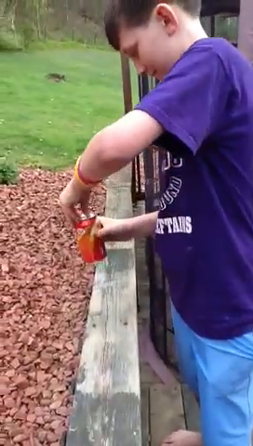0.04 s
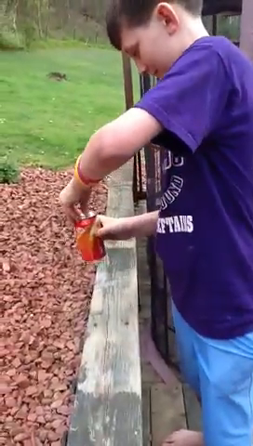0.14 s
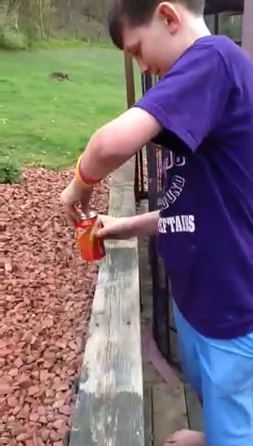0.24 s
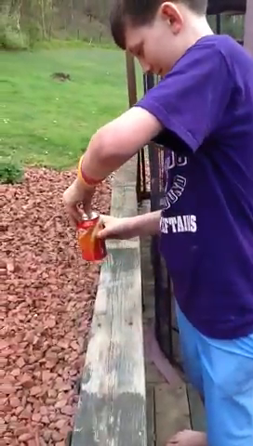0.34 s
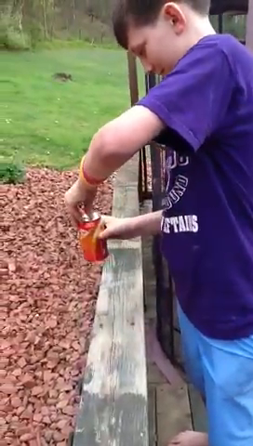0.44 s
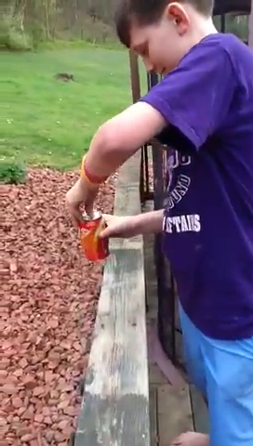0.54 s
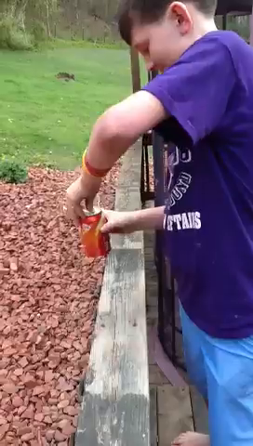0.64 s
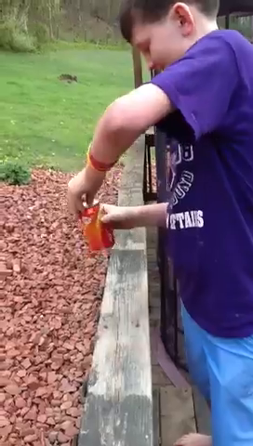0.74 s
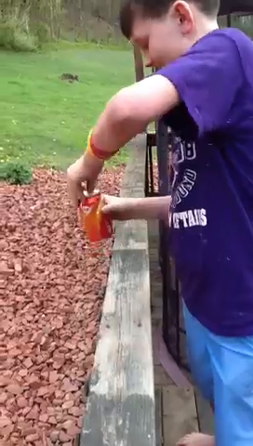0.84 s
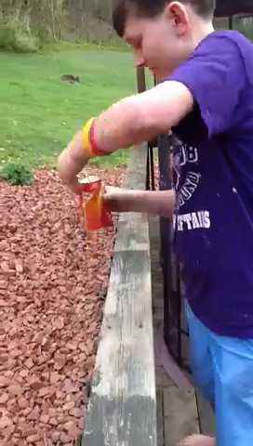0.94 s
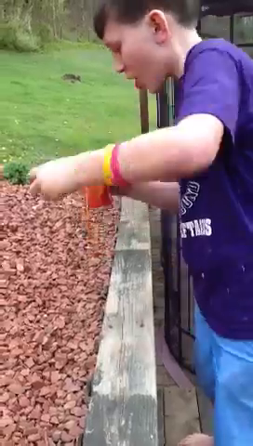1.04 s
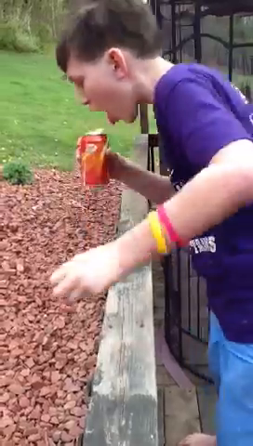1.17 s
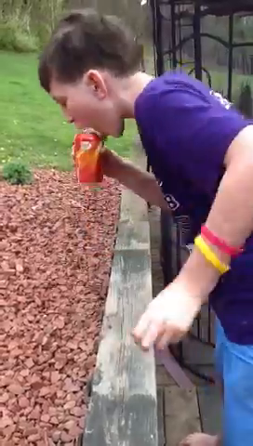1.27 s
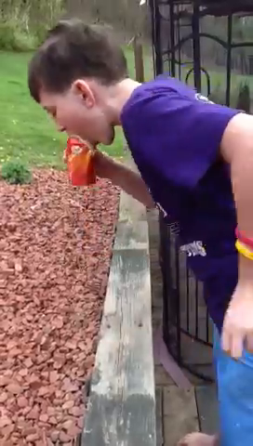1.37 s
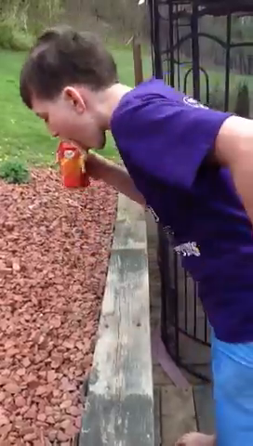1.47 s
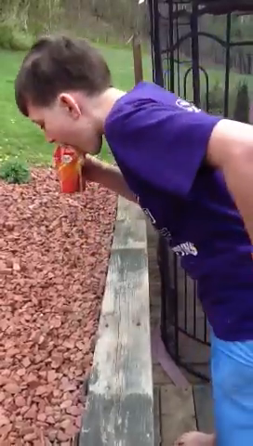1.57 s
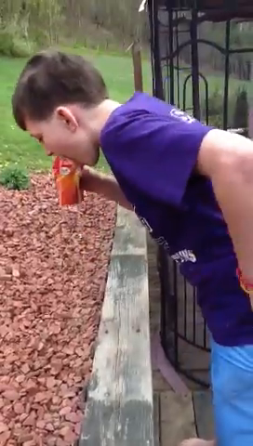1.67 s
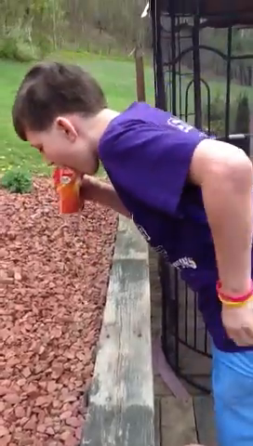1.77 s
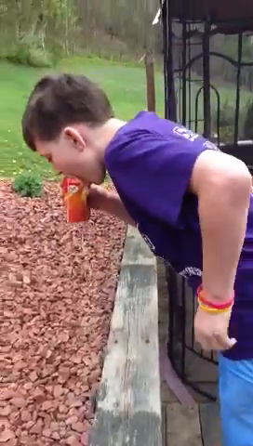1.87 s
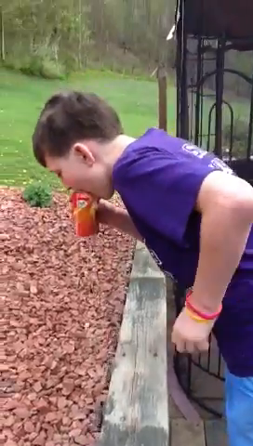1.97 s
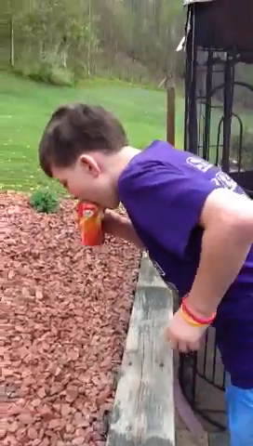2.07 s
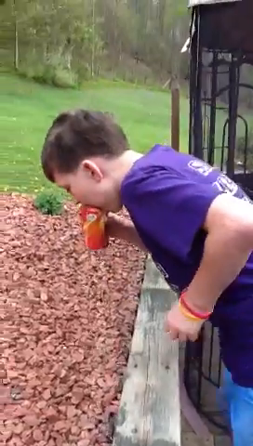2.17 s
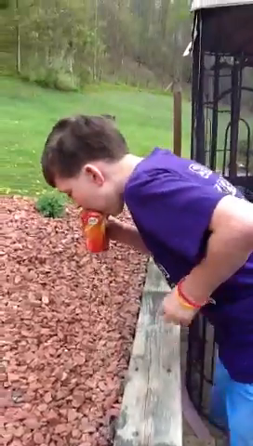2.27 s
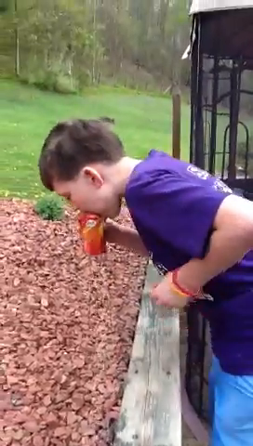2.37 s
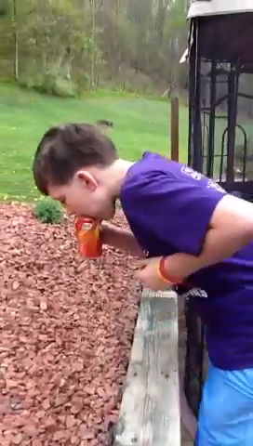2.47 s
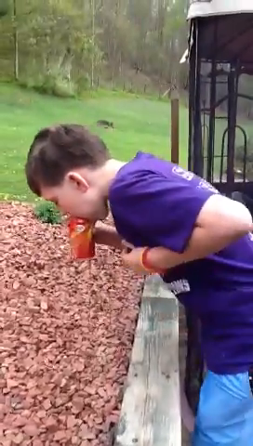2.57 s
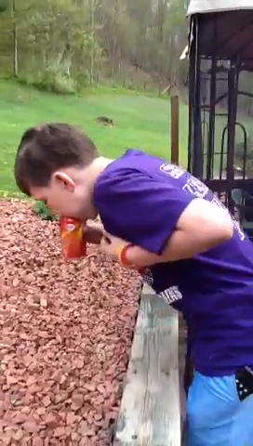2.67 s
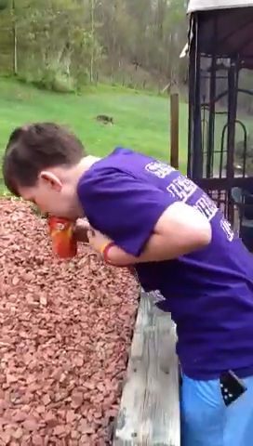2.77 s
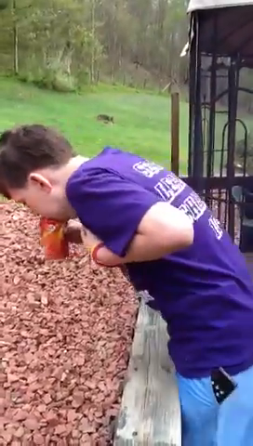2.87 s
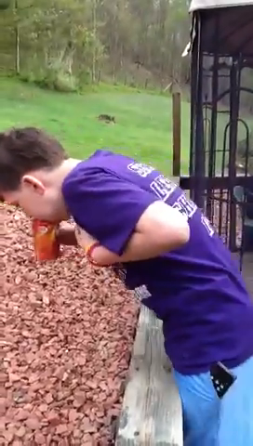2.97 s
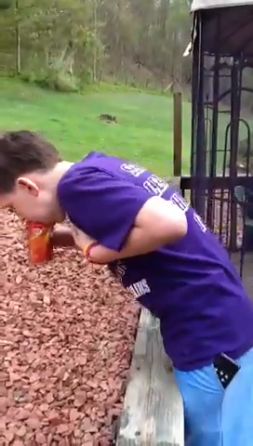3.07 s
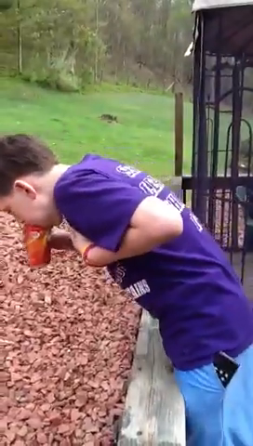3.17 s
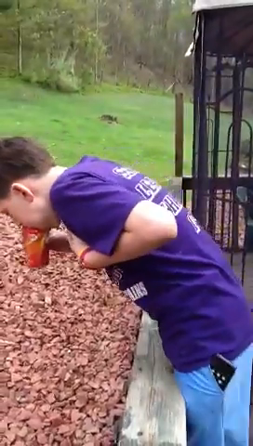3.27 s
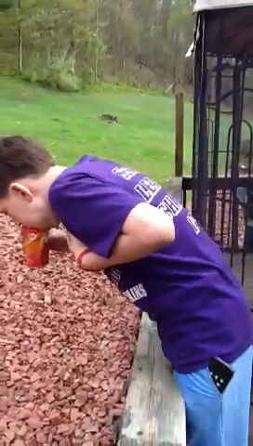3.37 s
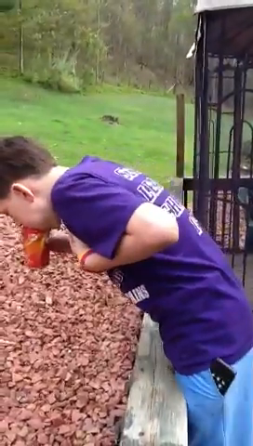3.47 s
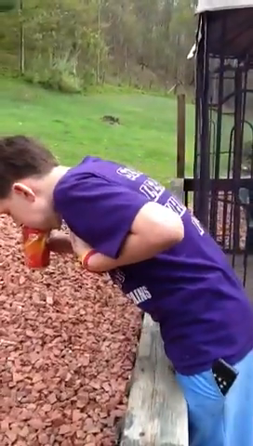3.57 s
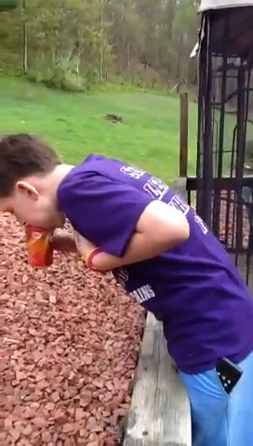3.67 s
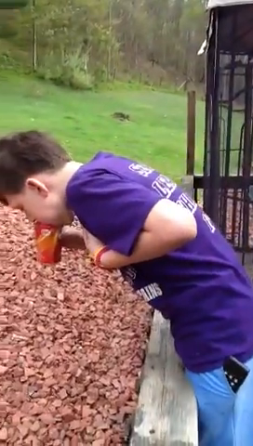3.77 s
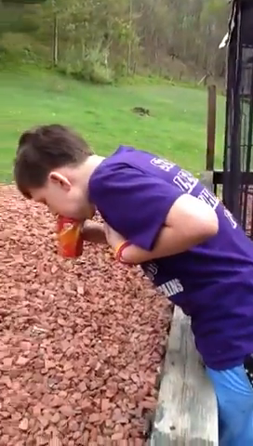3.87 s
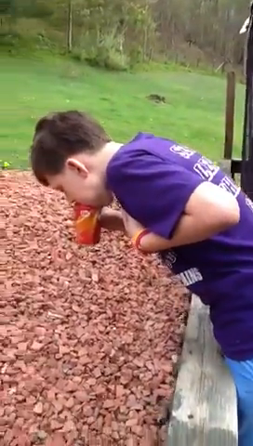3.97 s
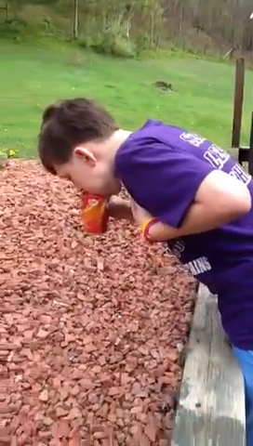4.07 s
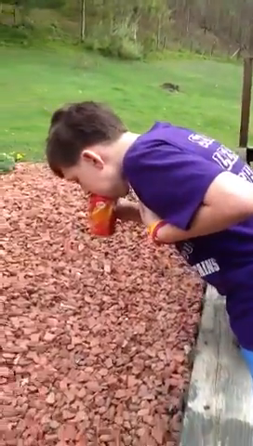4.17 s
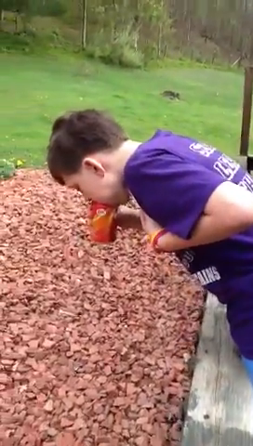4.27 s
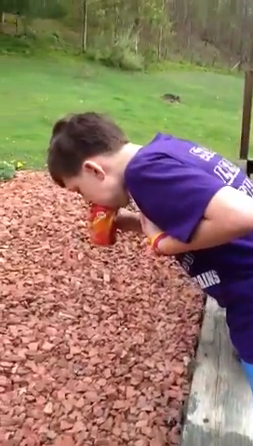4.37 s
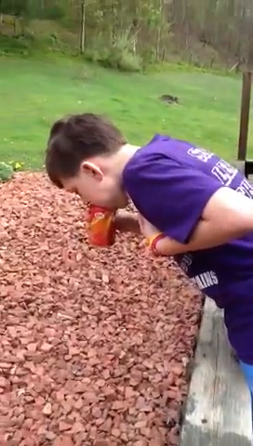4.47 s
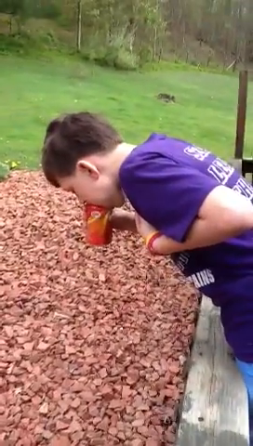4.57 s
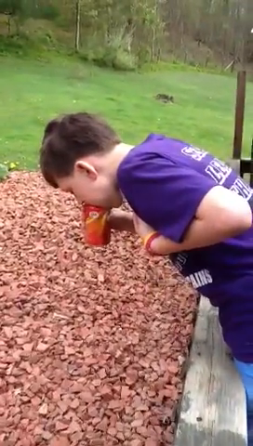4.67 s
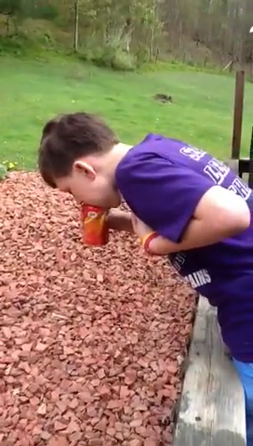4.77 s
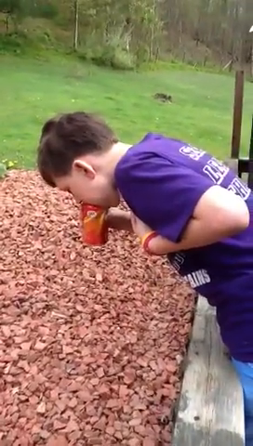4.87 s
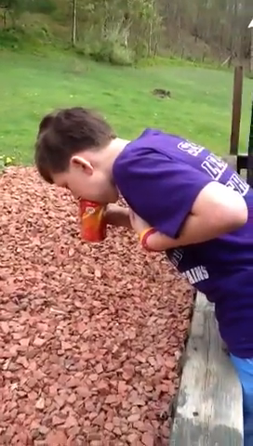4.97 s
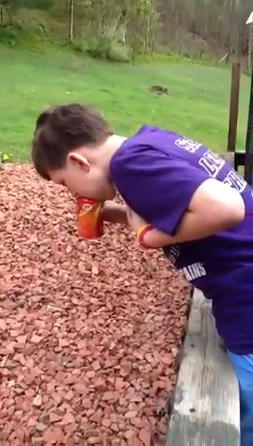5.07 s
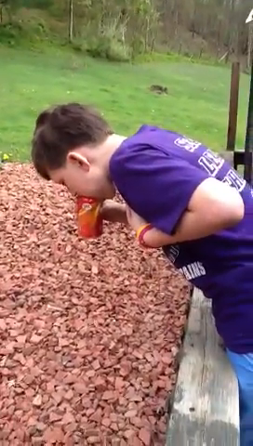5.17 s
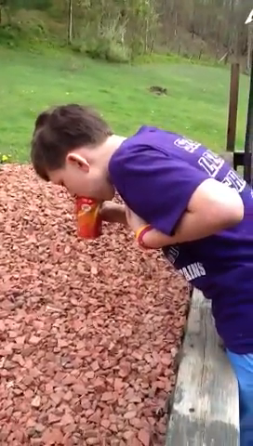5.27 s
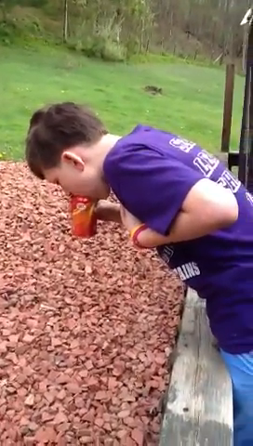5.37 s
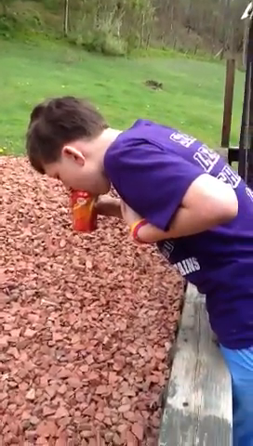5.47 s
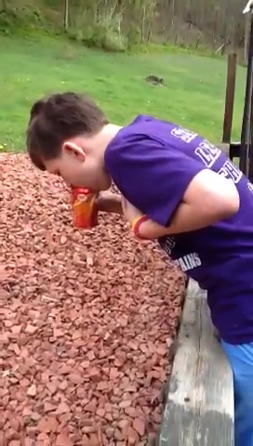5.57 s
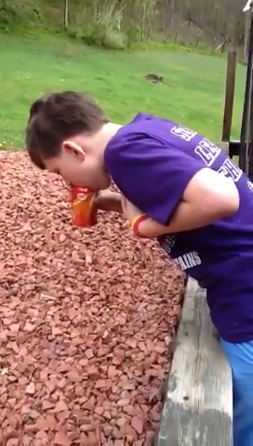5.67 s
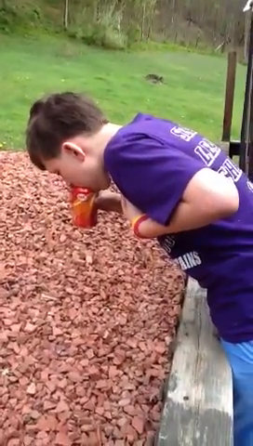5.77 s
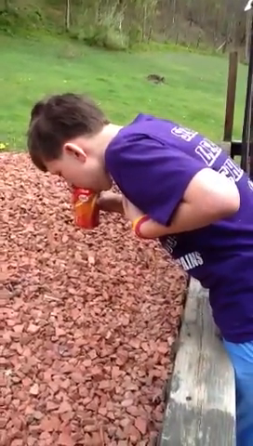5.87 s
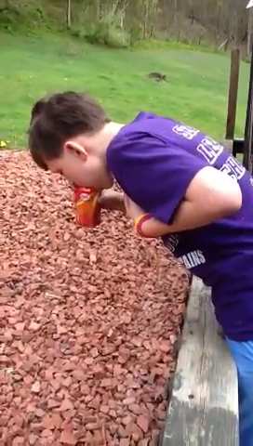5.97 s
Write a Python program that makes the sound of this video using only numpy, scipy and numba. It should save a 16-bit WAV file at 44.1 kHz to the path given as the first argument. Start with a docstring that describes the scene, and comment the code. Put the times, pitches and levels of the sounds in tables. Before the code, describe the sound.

A few dry metal ticks lead to a very loud, brief, sputtering hiss as a shaken can opens, ending in hard clicks. Much quieter crackling foam follows, thin at first, then a busy irregular patter of wet little drops on stones with bubbling and wash. Faint rustles and dull thuds on boards surround it, in a dry open garden heard from a step away on a phone.

```python
"""Drink can cracked open outdoors

A shaken can opens a step from a phone: the seal ticks, noise-made gas tears out, the tab snaps in and chokes it.
Foam runs over as fizz and wash; drops splat on gravel as short pings with spray, and bubbles gurgle as rising tones.
Soft thuds of feet on boards, rustles of filtered grit and a faint garden hush lie around the can.
The phone's gain control ducks under the blast and creeps back over seconds."""
import sys
import numpy as np
from scipy import signal
from scipy.fft import rfft, irfft, next_fast_len
from scipy.io import wavfile
from scipy.ndimage import uniform_filter1d
from numba import njit

SR = 44100
rng = np.random.default_rng(int(sys.argv[2]) if len(sys.argv) > 2 else 0)


def file_out(sig):
    """Save sig as 16-bit WAV at sys.argv[1]."""
    # one column per channel
    cols = np.atleast_2d(sig).T
    # limit, then scale
    lim = np.clip(cols, -1, 1)
    pcm = np.round(lim * 32767).astype(np.int16)
    wavfile.write(sys.argv[1], SR, pcm)


N = 265863  # length in samples, about 6 s


def undb(db):
    """Gain of a level in dB."""
    return 10 ** (np.asarray(db) / 20)


def curve(rows):
    """Gain along a table of (seconds, dB) rows; silent outside it."""
    s, db = np.transpose(rows)
    return undb(np.interp(np.arange(N) / SR, s, db, left=-200, right=-200))


def fall(t, t60):
    """Exponential decay that loses 60 dB in t60 seconds."""
    return np.exp(-np.log(1000) * t / t60)


def colour(x, points):
    """Shape a signal's spectrum by (Hz, dB) points and bring it to rms 1."""
    hz, db = np.transpose(points)
    size = next_fast_len(N)
    f = np.maximum(np.arange(size // 2 + 1) * SR / size, 1)
    gain = undb(np.interp(np.log(f), np.log(hz), db))
    y = irfft(rfft(x, size) * gain, size)[:N]
    return y / np.sqrt(np.mean(y ** 2))


def walk(rate, size=N):
    """Random levels of spread near 1, a new one every 1 / rate seconds, with straight slides between them."""
    k = int(SR / rate)
    held = np.repeat(rng.standard_normal(size // k + 1), k)
    return uniform_filter1d(held, k)[:size]


def add(out, s, sound):
    """Mix a short sound in at time s."""
    i = int(s * SR)
    out[i:i + len(sound)] += sound[:max(N - i, 0)]


def band(x, low_hz, high_hz):
    """Band-pass between two frequencies."""
    return signal.sosfilt(signal.butter(2, [low_hz, high_hz], "band", fs=SR, output="sos"), x)


def ring(hz, t60, rise, glide=0.):
    """A decaying tone with a rounded onset and peak 1; a positive glide raises its pitch as it rings."""
    t = np.arange(int(t60 * SR) + 9) / SR
    tone = np.sin(2 * np.pi * hz * t * (1 + glide * t / t60))
    y = fall(t, t60) * (1 - np.exp(-t / rise)) * tone
    return y / np.max(np.abs(y))


def splat(hz, t60, spray_db, spray_t60, low_hz):
    """A short high-passed ping with a burst of spray noise over it."""
    t = np.arange(2048) / SR
    spray_band = signal.butter(4, [low_hz, 14500.], "band", fs=SR, output="sos")
    hiss = signal.sosfilt(spray_band, rng.standard_normal(len(t)))
    y = undb(spray_db) * hiss * fall(t, spray_t60) * (1 - np.exp(-t / 0.00018))
    thin = signal.butter(2, hz / 1.76, "high", fs=SR, output="sos")
    add(y, 0, signal.sosfilt(thin, ring(hz, t60, 1e-4)))
    return y


def grains(rate, spread_db, smear_s, cap=1.95):
    """Noise in random bursts, rate per second, of uneven but bounded size that decay over smear_s."""
    chance = rng.random((2, N))
    excess = np.minimum(-np.log(1 - chance[1]), cap)
    size = (chance[0] < rate / SR) * undb(spread_db * excess)
    swell = signal.lfilter([1], [1, -np.exp(-1 / (smear_s * SR))], size)
    return swell * rng.standard_normal(N)


def hollow(hz, width_hz):
    """Noise in a resonance whose centre follows hz, made by shifting slow noise up in pitch; rms 1."""
    low_pass = signal.butter(2, width_hz / 2, fs=SR, output="sos")
    slow = signal.sosfilt(low_pass, rng.standard_normal((2, len(hz))))
    phase = 2 * np.pi * np.cumsum(hz) / SR
    y = slow[0] * np.cos(phase) + slow[1] * np.sin(phase)
    return y / np.std(y)


def patchy(x, edges, slow_db, quick_db):
    """Split at the edges (Hz); every band swells and flickers on its own."""
    out = 0
    for hz in edges:
        low = signal.sosfilt(signal.butter(1, hz, fs=SR, output="sos"), x)
        out = out + low * undb(slow_db * walk(6.0) + quick_db * walk(22))
        x = x - low
    return out + x * undb(slow_db * walk(3.97) + quick_db * walk(22))


def garden():
    """Outdoor hush: coloured noise that wanders band by band."""
    # Tone of the hush. Each row: frequency in Hz, relative density in dB per Hz.
    hush_colour = [(15, -62.5), (25, -35), (118, -7.5), (172, -1.5), (465, -6), (592, -4.5), (754, -1.5),
                   (1040, -5), (1600, -7), (2100, -7), (4800, -10.5), (13300, -14.5), (15200, -15.5)]
    # The hush swells and sinks. Each row: time in seconds, level in dB.
    hush_level = [(0, -59), (2, -56), (4, -56.5), (4.5, -55.5), (5, -58), (6.03, -58)]
    noise = colour(rng.standard_normal(N), hush_colour)
    edges = (130., 300., 550., 1000., 1800., 3500.)
    return curve(hush_level) * patchy(noise, edges, slow_db=1.85, quick_db=2.0)


def gurgles():
    """Bubbles ring longer the lower they are, rise in pitch and are blurred by the foam; faint ones murmur low."""
    # Bubbles at the rim. Each row: start in seconds, peak in dB before the blur, starting pitch in Hz.
    bubbles = [(1.378, -53, 1010), (1.495, -55, 1760), (2.775, -53.5, 660), (3.076, -56, 1750),
               (3.105, -55.5, 630), (3.108, -57, 956), (3.463, -51.5, 623), (3.756, -51.5, 1940),
               (4.245, -55, 2297), (4.624, -53, 2100), (4.841, -55, 887), (5.053, -48.5, 2440),
               (5.188, -52, 1710), (5.379, -52.5, 864), (5.452, -56, 1045), (5.564, -50.5, 1720),
               (5.613, -51, 2270), (5.672, -51, 962), (5.686, -53.5, 1020), (5.778, -54, 795)]
    out = np.zeros(N)
    for s, db, hz in bubbles:
        add(out, s, undb(db) * ring(hz, 0.0086 + 31 / hz, 2.6 / hz, glide=0.059))
    for when, pitch, size in rng.random((420, 3)):  # the murmur runs from start to end
        tone = ring(580. * 1.9 ** pitch, 0.055, 0.0059, glide=0.025)
        add(out, when * N / SR, undb(-63.5 - 5.2 * size) * tone)
    return out * (1 + 0.4 * walk(400))


def handling():
    """Dry ticks of fingers on the tab, and faint hollow tones of the shell that waver in level."""
    # Finger ticks. Each row: start in seconds, ping peak in dB, pitch in Hz.
    ticks = [(0.066, -41.5, 3900), (.341, -45, 6040), (.426, -49, 5200), (.867, -40, 2380),
             (.879, -45, 2220), (.895, -45, 3300)]
    # Shell tones. Each row: centre in seconds, reach to either side in seconds, level in dB, pitch in Hz.
    shell_tones = [(0.113, .025, -64, 1980), (0.11, 0.022, -63, 770), (0.128, .03, -63, 930),
                   (0.234, .02, -62.5, 606), (0.51, .07, -57, 615)]
    out = np.zeros(N)
    for s, db, hz in ticks:
        add(out, s, undb(db) * splat(hz, 14 / hz, -4.0, spray_t60=0.0072, low_hz=3000.))
    for s, reach, db, hz in shell_tones:
        swell = np.hanning(int(2 * reach * SR))
        tone = np.sin(2 * np.pi * hz * np.arange(len(swell)) / SR)
        waver = 1 + .4 * walk(150)[:len(swell)]
        add(out, s - reach, undb(db) * swell * tone * waver)
    return out


def rustles():
    """Hands, cloth, splashes and low stirs: swells of grainy noise about two octaves wide."""
    # Each row: centre in seconds, reach to either side in seconds, level in dB, middle of the band in Hz.
    swells = [(0.432, 0.046, -59, 4900), (1.214, 0.024, -59, 4600), (1.348, 0.062, -58.5, 1760),
              (2.638, 0.042, -56.5, 4880), (2.933, 0.022, -52.5, 4500), (3.298, 0.059, -53, 8050),
              (3.502, 0.055, -54, 4500), (4.332, 0.025, -50.5, 6960), (4.517, 0.055, -55.5, 5500),
              (4.5, 0.43, -60.5, 400)]
    grit = grains(1500., 1.5, 0.0011)
    out = np.zeros(N)
    for s, reach, db, hz in swells:
        swell = np.hanning(int(2 * reach * SR))
        part = band(grit[int(s * SR):][:len(swell)], hz / 2.04, min(2.0 * hz, 19000.))
        add(out, s - reach, undb(db) * swell * part / np.std(part))
    return out


def pressure():
    """Gains of the jet, its treble and its bass: a thin leak, the hole bursts, pressure sags, the tab chokes it."""
    leak_s, leak_db = .547, -44
    burst_s, burst_db, burst_rise_s, burst_from_db = .5585, -10, 0.011, -12  # starts 12 dB under its target
    bass_from_db, bass_rise_s = -15, 0.0094  # the low rush fills in after the burst
    sag_db, sag_s = -5, 0.013  # loss reached at the snap, and how late it sets in
    snap_s, choke_s, choked_db, fade_db_s = 0.7238, 0.0022, -25.5, 598
    treble_db, early_db, early_s, late_db, late_s = 4.5, 3.75, 0.0096, -26.25, 0.015
    t = np.arange(N) / SR
    since = np.maximum(t - burst_s, 0)
    until = np.maximum(snap_s - t, 0)
    choked = np.clip((t - snap_s) / choke_s, 0, 1)

    blow_db = np.where(t > burst_s, burst_db, leak_db)
    blow_db = blow_db + burst_from_db * np.exp(-since / burst_rise_s) + sag_db * np.exp(-until / sag_s)
    dying_db = choked_db - fade_db_s * np.maximum(t - snap_s, 0)
    level_db = (1 - choked) * np.maximum(blow_db, leak_db) + choked * dying_db
    bright_db = treble_db + early_db * np.exp(-since / early_s) + late_db * np.exp(-until / late_s)

    level = undb(np.maximum(level_db, -200)) * (t > leak_s)
    treble = undb((1 - choked / 1.5) * bright_db)  # choking leaves a third of the tilt
    bass = undb(bass_from_db * np.exp(-since / bass_rise_s))
    return level, treble, bass


def jet():
    """Turbulent gas whose bands sputter apart and whose resonances surge and shift, and the tearing lid."""
    # Tone of the gas. Each row: frequency in Hz, relative density in dB per Hz.
    gas_colour = [(71, -72), (120, -32), (220, -19.5), (856, -21), (1600, -19.5), (2200, -8.5), (2720, -11),
                  (2950, -8), (4510, -3.5), (6110, -3), (8800, -2.5), (10100, -6), (15200, -4.5)]
    # Resonances of the torn opening. Each row: centre in Hz, width in Hz, level in dB re the jet before surging.
    opening = [(1101, 300, -29), (2250, 600, -24), (4404, 1200, -17)]
    # Tears of the lid. Each row: start in seconds, ping peak in dB, pitch in Hz, ping t60 in seconds,
    # drive of the crack noise in dB re the ping, low edge of the crack in Hz.
    tears = [(0.5443, -21.5, 4910, 0.0056, 6, 4000), (0.565, -9, 8130, .004, -4.5, 4530),
             (0.604, -5, 8800, .004, -3.5, 4000), (0.6672, 2, 4900, 0.004, -4, 3500),
             (0.672, -1.5, 4450, 0.0076, -6.5, 2980), (0.6998, 0, 4840, 0.003, 0, 4200),
             (0.7185, 0, 5800, 0.0015, 2, 1600)]
    wander, surge_db = .08, 3.5  # spread of each centre as a share of it; level swing of each resonance
    gas = colour(rng.standard_normal(N), gas_colour)
    mid = band(gas, 3060.0, 6500.0)
    top = band(gas, 7800.0, 19100.0)
    spit = undb(0.78 * walk(700))  # droplets flutter the whole stream
    swings_db = ((2.1, 1.0), (1.0, 0.98), (0.63, 0.51))  # quick and slow, for the rest, mid and top
    sputter = [spit * undb(quick_db * walk(250) + slow_db * walk(59.9)) for quick_db, slow_db in swings_db]

    level, treble, bass = pressure()
    stream = (gas - mid - top) * sputter[0] * bass
    stream += mid * sputter[1] + top * sputter[2] * treble
    for hz, width_hz, db in opening:  # the jet is over within the first second
        surge = undb(db + surge_db * walk(70, size=SR)) * bass[:SR]
        centre = hz * (1 + wander * walk(30, size=SR))
        add(stream, 0, surge * hollow(centre, width_hz))
    out = level * stream
    for s, db, hz, t60, crack_db, low_hz in tears:
        add(out, s, undb(db) * splat(hz, t60, crack_db, 0.0052, low_hz))
    return out


def patter():
    """Running foam: fine fluttering fizz, small drops of mixed pitch, and a wet wash in the can's mouth."""
    # Tone of the fizz. Each row: frequency in Hz, relative density in dB per Hz.
    fizz_colour = [(900, -43), (1500, 9), (2400, -12), (5500, 5), (9000, -9), (14000, -13), (16000, 4.5)]
    # Foam over the rim. Each row: time in seconds, level in dB of its small drops once full-grown.
    foam = [(.8, -60), (1.3, -54), (2.2, -64.5), (2.85, -59.5), (3.35, -59), (3.8, -57.5), (4.05, -65),
            (4.55, -56.5), (4.75, -61.5), (4.95, -56), (5.2, -62), (5.45, -63), (6.03, -69.5)]
    # Wash in the can's mouth. Each row: time in seconds, level in dB.
    wash_level = [(.8, -71), (1.3, -73), (2.6, -65.5), (3.4, -81), (3.9, -68.5), (4.4, -57.5), (4.95, -64),
                  (5.2, -71), (6.03, -68)]
    fizz_db = -7  # re the full-grown small drops
    fizz = colour(grains(600., 5.7, 0.00052), fizz_colour)
    small = 0
    for hz in (2600.0, 3800.0, 4620.0, 6270.0, 10400.0):
        small = small + band(grains(90., 6.5, 0.0006, cap=2.1), hz, min(1.7 * hz, 19000.))
    # the small drops grow once foam reaches the ground
    drips = undb(np.interp(np.arange(N) / SR, [1.44, 1.44 + 0.68], [-7.5, 0]))
    wash_colour = [(900, -27), (1800, 0.5), (2300, 2.0), (2550, -4.5), (2800, 3.0), (4200, -27)]  # (Hz, dB)
    wash = colour(grains(500., 3.5, 0.0033, cap=1.3), wash_colour)
    foaming = undb(fizz_db) * fizz + drips * small / np.std(small)
    return curve(foam) * foaming + curve(wash_level) * wash


def drops():
    """Each drop landing on gravel pings briefly and scatters spray."""
    # Each row: time in seconds, to which 0.74 ms is added, ping peak in dB, pitch in Hz,
    # drive of the spray noise in dB re the ping.
    landings = [(1.9346, -40, 9150, 6), (2.0067, -47, 3140, 13), (2.284, -36.5, 10600, -10),
                (2.303, -38.5, 7630, 4), (2.4515, -33, 6500, -9), (2.758, -39, 7210, 1),
                (2.8047, -33, 3240, -6), (2.8206, -34.5, 4450, -5.5), (2.8424, -32.5, 2920, -6),
                (2.9473, -50, 3700, 14), (2.9655, -34, 4850, 1.5), (3.011, -38, 4700, -5),
                (3.0474, -37.5, 7050, 0), (3.25, -34, 5950, -13), (3.344, -32.5, 10600, -7),
                (3.367, -36, 2800, 2), (3.385, -38, 9000, -10), (3.3974, -40, 3200, 0),
                (3.4318, -40, 8000, -2), (3.4694, -41, 6500, 0), (3.56, -33.5, 6340, -3.5),
                (3.588, -36, 3980, 0), (3.6203, -32.5, 6900, -5), (3.6685, -37, 6680, -1),
                (3.712, -39, 4400, -6), (3.75, -41.5, 4730, 2), (3.792, -37.5, 3430, -16),
                (3.8265, -33.5, 4560, -22), (3.866, -38, 5960, -2), (3.881, -26.5, 5330, -3.5),
                (3.9103, -38, 10800, -9), (3.938, -42, 9000, 3), (3.9422, -39.5, 5800, -4),
                (3.9695, -48, 5180, 5), (4.0873, -38.5, 4230, -2.5), (4.1502, -29, 4700, -9.5),
                (4.178, -42, 4940, -1), (4.2032, -44, 2800, 6), (4.2304, -34, 4100, -3.5),
                (4.266, -39.5, 4210, -3), (4.278, -35.5, 5800, -6), (4.2969, -34.5, 7900, -17),
                (4.312, -42, 4500, 2), (4.41, -41, 4000, -4), (4.482, -40.5, 5510, 3.5),
                (4.495, -40, 4800, -4), (4.5251, -33, 5720, -7), (4.536, -42, 4050, 4),
                (4.5714, -39, 7430, -1), (4.591, -34.5, 7740, -8), (4.6326, -36, 5140, -11),
                (4.644, -31.5, 6000, -5), (4.663, -36, 6500, 0), (4.694, -40.5, 5560, -3),
                (4.7256, -32.5, 5900, -9), (4.7593, -32.5, 4670, -3.5), (4.7955, -41, 9570, 0.5),
                (4.8281, -28, 8700, -7), (4.909, -32, 8150, -6), (4.9527, -37, 8370, -9),
                (4.9654, -36, 4430, -3), (5.0115, -39, 6080, -5), (5.053, -35.5, 8100, -2),
                (5.0936, -35.5, 7150, -12), (5.11, -37, 8520, -9), (5.1374, -41.5, 8360, 5.5),
                (5.152, -35, 8300, -5), (5.1874, -35.5, 3040, 0.5), (5.2326, -29, 4870, -10),
                (5.2489, -33, 4440, -0.5), (5.293, -38, 4200, -3), (5.335, -38.5, 5650, 0.5),
                (5.3812, -33.5, 8100, 0), (5.4498, -36, 9700, -7), (5.495, -42, 11200, -0.5),
                (5.636, -38.5, 7100, 0.5), (5.687, -44, 11000, -3), (5.7472, -39, 5700, -6),
                (5.959, -47.5, 10000, -2)]
    out = np.zeros(N)
    for s, db, hz, spray_db in landings:
        add(out, s + 0.00074, undb(db) * splat(hz, 16 / hz, spray_db, spray_t60=0.014, low_hz=2950.0))
    return out


def feet():
    """Soft thuds through the boards, each a blunt ring with a rough rumble that outlasts its decay."""
    # Each row: start in seconds, ring peak in dB, pitch in Hz, ring t60 in seconds.
    thuds = [(2.855, -57, 400, 0.1), (2.872, -50.5, 283, 0.085), (3.2, -47, 398, 0.025),
             (3.202, -53, 205, 0.11), (5.709, -63.5, 84, 0.17), (5.925, -53.5, 95.5, 0.12)]
    out = np.zeros(N)
    for s, db, hz, t60 in thuds:
        rumble = band(rng.standard_normal(8192), hz / 1.6, hz * 1.6)
        fade = fall(np.arange(len(rumble)) / SR, 2.9 * t60)
        add(out, s, undb(db) * ring(hz, t60, 1.6 / hz))
        add(out, s, undb(db - 4.0) * fade * rumble / np.std(rumble))
    return out


def slurp():
    """A slurp at the rim: rough hollow noise whose pitch falls as foam is sucked in."""
    start_s, length_s, level_db = 2.925, 0.044, -53.5
    from_hz, to_hz, width_hz = 3300, 849, 800
    swell = np.hanning(int(length_s * SR))
    out = np.zeros(N)
    hz = np.geomspace(from_hz, to_hz, len(swell))
    add(out, start_s, undb(level_db) * np.sqrt(swell) * hollow(hz, width_hz))
    return out


def porch(near):
    """Short scatter back from porch and ground: a decaying noise tail after a 2 ms gap."""
    t60_s, level_db = 0.044, -12  # level: energy of the scatter re the direct sound
    t = np.arange(int(.15 * SR)) / SR
    tail = rng.standard_normal(len(t)) * fall(t, t60_s) * (t > .002)
    tail = undb(level_db) * tail / np.sqrt(np.sum(tail ** 2))
    return signal.fftconvolve(near, tail)[:N]


def scene():
    """The can's sounds with their scatter, plus feet, rustles and garden; one microphone feeds both channels."""
    near = gurgles() + handling() + jet() + patter() + drops() + slurp()
    mono = garden() + rustles() + near + porch(near) + feet()
    return np.array([mono, mono])


@njit
def duck(want_db, attack, recover):
    """Gain in dB: falls quickly to what the level asks for, climbs back at a steady pace."""
    out, g = np.empty(len(want_db)), 0.
    for i in range(len(want_db)):
        if want_db[i] < g:
            g = g + attack * (want_db[i] - g)
        else:
            g = min(g + recover, want_db[i])
        out[i] = g
    return out


def record(dry):
    """Gain control driven by the power smoothed over 20 ms, then the deep bass and the top are cut."""
    knee_db, squeeze = -39.5, 0.34  # squeeze: dB of cut asked for per dB above the knee
    attack_s, recover_db_s = 0.0012, 4.5
    shelf_hz, top_hz = 15250, 16387  # where the top drops by 38 dB, and the final cut
    power = signal.lfilter([1 / 882], [1, 1 / 882 - 1], dry[0] ** 2)  # 882 samples are 20 ms
    level_db = 10 * np.log10(power + 1e-12)
    want_db = -squeeze * np.maximum(level_db - knee_db, 0)
    y = dry * undb(duck(want_db, 1 / (attack_s * SR), recover_db_s / SR))
    y = signal.sosfilt(signal.butter(2, 65., "high", fs=SR, output="sos"), y)
    y = signal.sosfilt(signal.ellip(8, .2, 38, shelf_hz, fs=SR, output="sos"), y)
    return signal.sosfilt(signal.ellip(10, .2, 70, top_hz, fs=SR, output="sos"), y)


dry = scene()
out = record(dry)
file_out(out)
```